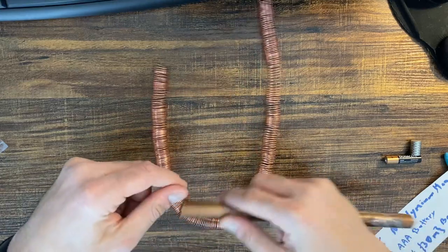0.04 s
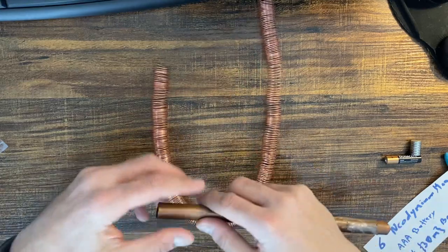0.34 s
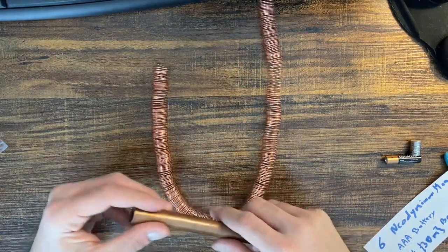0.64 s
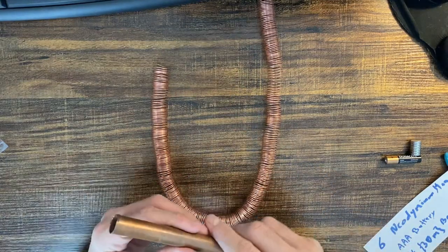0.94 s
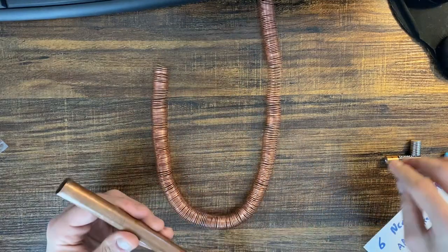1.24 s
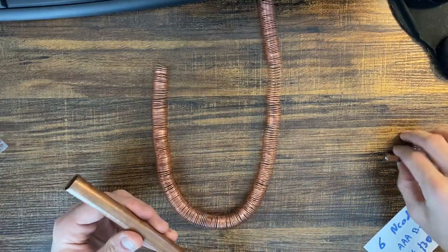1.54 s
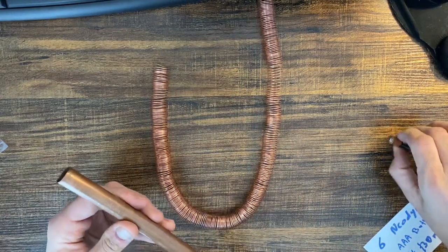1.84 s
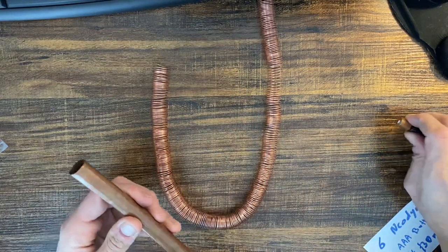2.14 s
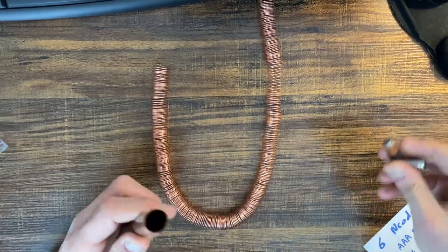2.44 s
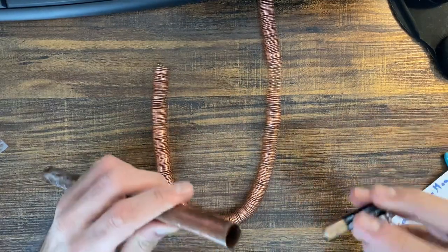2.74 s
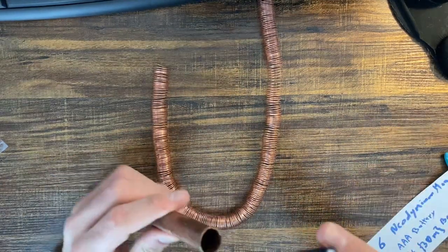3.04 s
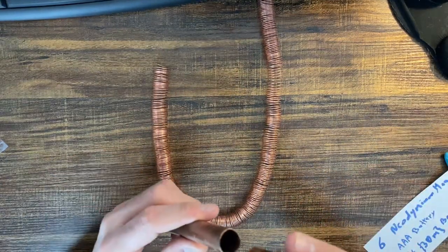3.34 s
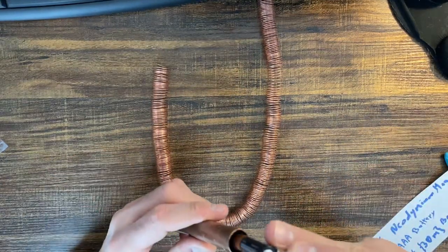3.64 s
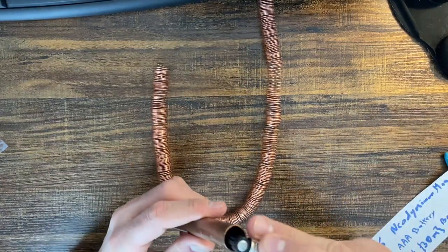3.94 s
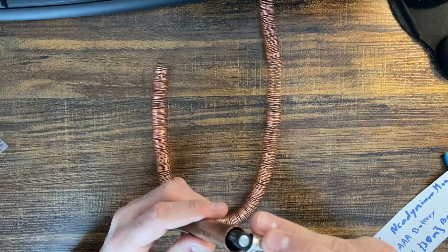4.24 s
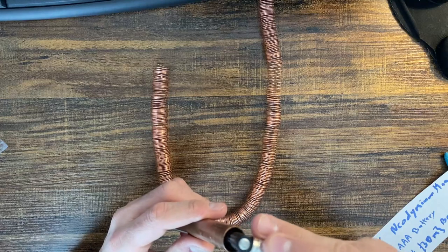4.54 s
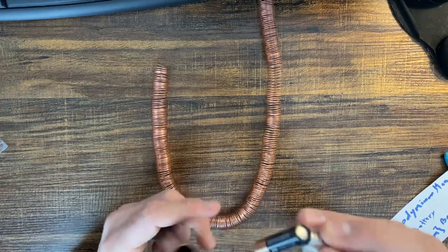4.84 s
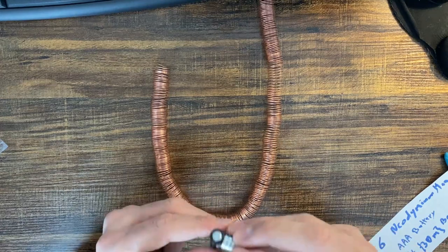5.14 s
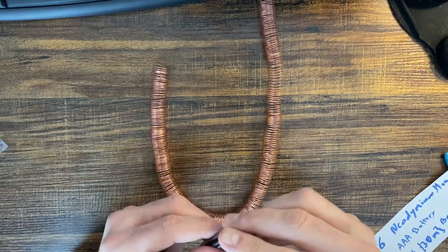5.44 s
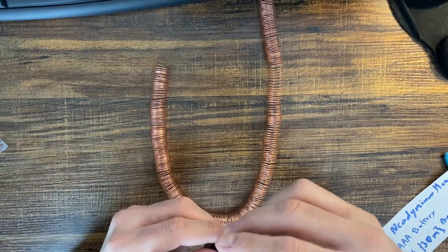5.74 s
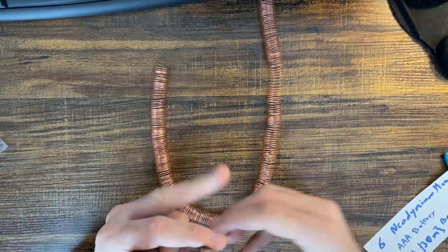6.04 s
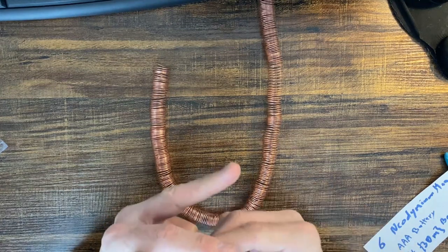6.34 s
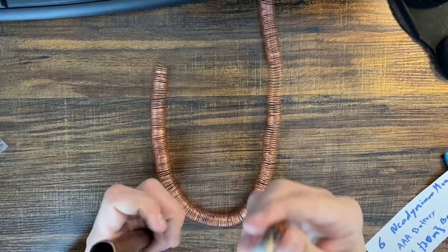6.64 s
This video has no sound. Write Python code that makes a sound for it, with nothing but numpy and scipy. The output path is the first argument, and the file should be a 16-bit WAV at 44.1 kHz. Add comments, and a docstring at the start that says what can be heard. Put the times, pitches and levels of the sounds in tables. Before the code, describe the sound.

Close handling of a copper tube and a battery with magnets: sharp snaps, metallic clinks and hollow knocks on a wooden table.

```python
"""Fingers rub faintly on a copper tube over the low rumble of arms leaning on a wooden table.
A battery with magnets scrapes across the wood, the magnets snap against metal, and knocks make the
top boom and clack. Tried in the mouth of the hand-held tube, the metal clinks briefly; fingernails
and wire tick. A small room, heard close up through the two microphone ports of a camera."""
import sys
import numpy as np
from scipy import signal
from scipy.fft import rfft, irfft, next_fast_len
from scipy.io import wavfile
from scipy.ndimage import map_coordinates

SR = 44100
rng = np.random.default_rng(int(sys.argv[2]) if len(sys.argv) > 2 else 0)


def waveform_to_disk(signal):
    """Save audio, clipped to [-1, 1], as 16-bit WAV at the path in sys.argv[1]."""
    frames = np.transpose(np.atleast_2d(signal))
    scaled = np.clip(frames, -1, 1) * 32767
    samples = np.round(scaled).astype(np.int16)
    wavfile.write(sys.argv[1], SR, samples)


N = 295029

# blows on the table: start_s, level_db, then relative to that level: boom_db, rap_db, clack_db
BLOWS = [(1.733, -49, 3.5, -21.5, -12.5), (1.741, -48.5, 6, -11.5, -14.5), (1.943, -53, -2, -12.5, -20),
         (1.985, -54.5, 2.5, -1, -5.5), (2.003, -50.5, -0.5, -14, -2), (2.051, -48.5, -7.5, -25, -11),
         (2.371, -22, -8, 1, -3), (2.483, -23.5, -8, 3.5, -5.5), (4.127, -41, -3, -16.5, -21),
         (4.331, -40, -4, -11, -21), (4.747, -22.5, -3.5, -1, -9), (4.828, -36.5, 2.5, 2, -12),
         (4.841, -30, -10, -2.5, -12), (4.859, -28, -7.5, -9, -16), (5.537, -29, -4, -5.5, -18),
         (5.716, -49.5, 3, -25.5, -30), (5.757, -50.5, 0.5, -8, -29), (5.824, -43, -2, -6, -14),
         (5.839, -27.5, -6, -6, -16), (5.945, -50, -0.5, -22, -9), (5.978, -45.5, 3.5, -24, -14.5),
         (6.141, -34, -2.5, -3.5, -17.5), (6.24, -34.5, -7, -10.5, -27), (6.648, -26, -5.5, -6.5, -16)]
# wall modes of the copper tube: pitch_hz, level_db, free_t60_s
TUBE_MODES = [(954, -21.5, 0.4), (2633, -0.5, 0.032), (2760, 5.5, 0.074), (2720, -29, 0.23),
              (4630, -20, 0.083), (5060, 4.5, 0.059), (5100, -16, 0.25), (5440, -5, 0.16), (7450, 2, 0.1),
              (7834, -5.5, 0.13), (10400, -39, 0.072), (10700, -26, 0.4), (14350, -33, 0.094)]
# spectrum of the midrange clack of a hard contact: frequency_hz, level_db
CLACK_SPECTRUM = [(700, -46), (1250, -2), (1450, 2.5), (1700, 2.5), (2050, 0.5), (2650, -4.5), (3300, -10),
                  (4500, -15), (8000, -49)]
# spectrum of the bright edge of a metal contact: frequency_hz, level_db
EDGE_SPECTRUM = [(2500, -30), (3400, -8), (4300, -13), (4800, -4), (5050, 1), (5700, -14), (6400, -7),
                 (7700, -6), (8800, -24), (11300, -16), (12800, -32), (15000, -25), (16000, -38)]


def amp(db):
    """Gain of a level in dB."""
    return 10 ** (np.asarray(db) / 20)


def unit(x):
    """x at rms 1."""
    return x / np.sqrt(np.mean(x ** 2) + 1e-20)


def along(points, hz):
    """(frequency_hz, value) points read on a log axis."""
    knots_hz, values = np.transpose(points)
    return np.interp(np.log(hz + 1), np.log(knots_hz + 1), values)


def wobble(rate):
    """A smooth random curve, rate knots a second."""
    knots = rng.standard_normal(int(N * rate / SR) + 4)
    return map_coordinates(knots, [np.arange(N) * rate / SR])


def filtered(x, response):
    """x through a complex response of frequency."""
    size = x.shape[-1]
    padded = next_fast_len(size + SR // 8)
    return irfft(rfft(x, padded) * response(np.fft.rfftfreq(padded, 1 / SR)), padded)[..., :size]


def noise(spectrum, size, likeness=None):
    """Coloured stereo noise of rms 1; left and right are as alike as for near sound unless given."""
    # likeness of near sound at the two ports: frequency_hz, correlation
    near_likeness = [(120, 0.94), (300, 0.28), (700, 0.14), (2000, 0.048), (6000, 0.28), (12000, .5)]
    hz = np.fft.rfftfreq(size, 1 / SR)
    angle = np.arccos(np.clip(along(likeness or near_likeness, hz), -1, 1)) / 2
    coloured = rfft(rng.standard_normal((2, size))) * amp(along(spectrum, hz))
    mid, side = irfft(coloured * [np.cos(angle), np.sin(angle)], size)
    return unit(np.array([mid + side, mid - side]))


def age():
    """Seconds since a contact."""
    return np.arange(SR // 3) / SR


def fade(t, t60, rise):
    """Envelope of a contact: a quick rise, then a steady fall in dB."""
    t = np.maximum(t, 0)
    return np.exp(-np.log(1000) * t / t60) * (1 - np.exp(-t / rise))


def stroke(start_s, hold_s, attack_s, release_s):
    """Envelope that rises, holds and dies away."""
    t = np.maximum(np.arange(N) / SR - start_s, 0)
    return (1 - np.exp(-t / attack_s)) * np.exp(-np.maximum(t - hold_s, 0) / release_s)


def swell(peak_s, half_s):
    """Envelope of pressure that grows towards a peak and eases off as it came."""
    nearness = np.exp(-np.abs(np.arange(N) / SR - peak_s) / half_s)
    return 2 * nearness / (1 + nearness ** 2)


def grain(rate, spread_db, life_s):
    """Grainy envelope of rms 1: tiny pulses of uneven size, rate a second."""
    pulses = (rng.random(N) < rate / SR) * amp(spread_db * rng.standard_normal(N))
    power = signal.fftconvolve(pulses ** 2, np.exp(-age() / life_s))[:N]
    return unit(np.sqrt(np.abs(power)))


def burst(spectrum, t60, rise):
    """Many close modes struck together and dying fast."""
    t = age()
    return noise(spectrum, len(t)) * fade(t, t60, rise)


def ring(modes, colour, travel_s=0):
    """Struck modes at new strengths; with travel_s the slow, low bending waves arrive later."""
    hz, db, t60 = np.transpose(modes)[:, :, None]
    delay = travel_s * np.maximum(np.sqrt(600 / hz) - 1, 0)
    scatter_db = 1.5 * rng.standard_normal(hz.shape)
    polarity = (-1) ** np.arange(len(hz))[:, None]
    gain = polarity * amp(db + along(colour, hz) + scatter_db)
    t = age() - delay
    return np.sum(gain * np.sin(2 * np.pi * hz * t) * fade(t, t60, rise=0.5 / hz), axis=0)


def add(track, start_s, sound):
    """Mix a sound into the track."""
    start = max(round(start_s * SR), 0)
    part = sound[..., :N - start]
    track[:, start:start + part.shape[-1]] += part


def room_tone():
    """The faint, steady noise of the room, mostly bass."""
    # noise floor: frequency_hz, level_db
    floor_spectrum = [(20, -27), (32, -7.5), (48, -1), (74, -0.5), (180, -18), (344, -18.5), (911, -29.5),
                      (3000, -37), (7500, -42), (11000, -45.5), (16000, -49)]
    return amp(-70) * noise(floor_spectrum, N)


def reverb(x):
    """The diffuse answer of the small room; treble dies first."""
    # likeness of the reflections at the two ports: frequency_hz, correlation
    likeness = [(100, 1), (250, 1), (600, -0.12), (2500, 0.47), (5500, 0.42), (12000, -0.59)]
    # reverberation time: frequency_hz, t60_s
    decay_times = [(100, 1), (400, .6), (1500, 0.38), (4000, 0.28), (8000, 0.15), (15000, 0.11)]
    # strength of the reflections: frequency_hz, level_db
    colour = [(80, -18), (250, -10.5), (700, -11), (2000, -5), (5500, -10), (12000, -8.5)]
    white = noise([(20, 0), (20000, 0)], SR, likeness)
    hz, t, bands = signal.stft(white, SR, nperseg=256)
    t60 = along(decay_times, hz)[:, None]
    energy = SR * t60 / (2 * np.log(1000))
    gain = amp(along(colour, hz))[:, None] / np.sqrt(energy)
    _, tail = signal.istft(bands * fade(t, t60, rise=0.002) * gain, SR, nperseg=256)
    return signal.fftconvolve(x[:1], tail, axes=1)[:, :N]


def table_rumble():
    """Arms lean and hands push on the table, and blows leave it shuddering."""
    # hands pushing on the top: peak_s, level_db, width_s
    pushes = [(0.157, -62.5, .06), (0.491, -55, 0.03), (0.87, -57, .035), (1.482, -49, .015),
              (1.625, -50.5, .03), (1.937, -46, .028), (2.306, -51, .04), (5.483, -40.5, 0.04)]
    # forearms leaning on it: peak_s, half_length_s, level_db
    leans = [(0.196, 0.24, -62), (0.58, 0.074, -60.5), (1.146, 0.28, -66), (1.705, 0.088, -57.5),
             (5.26, 0.17, -56.5), (5.651, 0.12, -54)]
    # rumble of the table: frequency_hz, level_db
    rumble_spectrum = [(15, -27), (25, -11), (53, -1), (73, -3.5), (107, -9), (141, -13.5), (210, -20.5),
                       (348, -25.5), (382, -33.5), (532, -40.5), (600, -34.5), (780, -75.5), (1320, -120)]
    push_spectrum = [(45, -33.5), (90, 3.5), (130, -1.5), (220, -16.5), (500, -33), (1500, -62.5)]
    rest_db, uneven_db, shudder_db = -70, 3.5, -27
    t = np.arange(N) / SR
    pushing = sum(amp(db) * np.exp(-((t - s) / width_s) ** 2) for s, db, width_s in pushes)
    leaning = [amp(db) * swell(s, half_s) for s, half_s, db in leans]
    shudders = [amp(db + shudder_db) * stroke(s, 0, attack_s=0.03, release_s=0.21)
                for s, db, *_ in BLOWS]
    strength = np.sqrt(amp(rest_db) ** 2 + sum(part ** 2 for part in leaning + shudders))
    rumble = strength * amp(uneven_db * wobble(rate=13)) * noise(rumble_spectrum, N)
    return rumble + pushing * noise(push_spectrum, N)


def ticks():
    """Fingernails and wire make tiny dry contacts, each a broad band of noise."""
    # light contacts: start_s, relative_db, centre_hz
    touches = [(2.183, -64.5, 7400), (3.101, -55.5, 15000), (3.278, -52.5, 13900), (3.452, -65.5, 11800),
               (3.477, -58.5, 14100), (5.07, -32, 7900), (5.190, -36.5, 6470), (5.42, -50, 14370),
               (5.576, -48.5, 11300), (5.63, -42.5, 3590), (5.853, -60, 4000), (5.95, -78, 3570),
               (5.978, -80, 3630), (6.044, -46.5, 15300), (6.16, -51, 3930)]
    out = np.zeros((2, N))
    for start_s, db, hz in touches:
        band = [(hz / 10, -24), (hz / 2, -4), (hz, 0), (hz * 2, -3)]
        add(out, start_s, amp(db - 6.5) * burst(band, t60=0.022, rise=0.00053))
    return out


def click_tails():
    """A short, grainy hiss dies away after each of two sharp clicks."""
    # tails of the two clicks: start_s, level_db
    tails = [(5.066, -52), (5.186, -63.5)]
    # hiss of a tail: frequency_hz, level_db
    tail_spectrum = [(300, -4), (700, 0.5), (1500, -3), (3000, -1), (5000, -6), (6400, -14.5), (7800, -7.5),
                     (9500, -23.5), (11300, -15), (16000, -27)]
    level = sum(amp(db) * stroke(s, hold_s=0.012, attack_s=0.0071, release_s=0.063) for s, db in tails)
    return level * grain(rate=2500, spread_db=2, life_s=0.0033) * noise(tail_spectrum, N)


def tube_wall(hz):
    """Response of the rubbed tube: one narrow resonance for each mode."""
    width_hz = 60
    damping = 1j * hz * width_hz
    return sum(amp(db) * damping / (mode_hz ** 2 - hz ** 2 + damping) for mode_hz, db, _ in TUBE_MODES)


def finger_rubs():
    """Skin hisses on the copper; where it catches, the modes of the tube sing."""
    # strokes along the tube: peak_s, half_length_s, relative_hiss_db, relative_singing_db
    rubs = [(0.01, 0.0094, -67.5, -68), (0.673, 0.037, -66, -67), (0.801, 0.013, -77.5, -98),
            (0.899, 0.02, -69.5, -81), (1.05, 0.025, -73, -74), (1.816, 0.055, -83.5, -110),
            (1.995, 0.015, -77, -110), (3.122, 0.013, -77.5, -105), (3.28, .035, -78.5, -105),
            (3.464, .015, -88, -105), (4.39, 0.016, -87.5, -81.5), (4.636, 0.053, -87.5, -73),
            (5.419, 0.011, -70.5, -95)]
    # hiss of skin on copper: frequency_hz, level_db
    skin_spectrum = [(1200, -49), (2200, -31), (3600, -18), (5000, -5), (6500, -8), (8000, 0.5),
                     (9200, -22), (11000, 2.5), (13000, -12), (15500, 3)]
    pressure = sum(amp(db) * swell(s, half_s) for s, half_s, db, _ in rubs)
    catch = sum(amp(db) * swell(s, half_s) for s, half_s, _, db in rubs)
    hiss = pressure * grain(rate=2700, spread_db=3, life_s=0.0022) * noise(skin_spectrum, N)
    friction = noise([(1500, -11), (2800, 15), (5000, 0), (8000, -15)], N)
    singing = catch * unit(filtered(friction, tube_wall))
    return amp(6) * hiss + amp(-9.5) * singing


def tube_clinks():
    """Metal touches the tube: a crack, then wall modes that die sooner the tighter it is held."""
    # contacts with the tube: start_s, level_db, treble_db, share of the free ring time left by the grip
    contacts = [(0.003, -77.5, 8, 1), (0.205, -74, 5, 0.69), (0.873, -90.5, 22, .95),
                (3.711, -43.5, -5, 0.75), (4.031, -47, 6, 0.27), (4.346, -70, -21.5, .9)]
    # crack of metal on copper: frequency_hz, level_db
    crack_spectrum = [(300, -6), (700, -3), (1100, 1), (1800, -9), (2700, 3.5), (3500, -6.5), (4700, 6.5),
                      (6300, -7.5), (7800, 6), (9000, -20), (11000, 0.5), (15000, -20)]
    out = np.zeros((2, N))
    for start_s, db, treble_db, ring_share in contacts:
        colour = [(2800, db), (5000, db + treble_db)]
        crack = burst(crack_spectrum, t60=0.026, rise=0.001)
        crack = filtered(crack, lambda hz: amp(along(colour, hz)))
        held_modes = [(hz, mode_db, t60 * ring_share) for hz, mode_db, t60 in TUBE_MODES]
        add(out, start_s, ring(held_modes, colour) + 2 * crack)
    return out


def battery_drags():
    """Metal breaks loose at once, catches and slips on the grain of the wood, and coasts to a stop."""
    # pulls across the top: start_s, length_s, level_db
    pulls = [(1.454, 0.09, -69), (1.559, 0.042, -47.5), (1.73, 0.0086, -53), (1.993, 0.011, -42.5),
             (2.043, 0.023, -59), (5.733, 0.14, -64), (5.872, 0.062, -56.5), (5.993, 0.046, -65)]
    # metal scraping on wood: frequency_hz, level_db
    scrape_spectrum = [(180, -23), (300, 4), (460, -17.5), (700, 5), (900, -6), (1050, -3), (1250, -12),
                       (2200, -17), (3000, -26), (4000, -36.5), (7000, -64), (12000, -83)]
    pressure = sum(amp(db) * stroke(s, length_s, attack_s=0.004, release_s=0.02)
                   for s, length_s, db in pulls)
    return pressure * grain(rate=500, spread_db=3, life_s=0.003) * noise(scrape_spectrum, N)


def magnet_snaps():
    """Magnets jump the last bit and hit with a hard crack and a very short ring."""
    # magnets hitting metal: start_s, level_db
    snaps = [(2.3755, -24), (2.3801, -28), (4.7486, -39.5)]
    # modes of magnets pressed face to face: pitch_hz, level_db, t60_s
    magnet_modes = [(1790, -3.5, .05), (2670, -4, .03), (3205, -3.5, .05), (4950, 2, .04), (5120, -1, .035),
                    (6380, -4, .04), (7280, -9, .03), (7760, -4, 0.053), (9500, -12, .04),
                    (11400, -15.5, 0.036), (14950, -18.5, .05)]
    out = np.zeros((2, N))
    for start_s, db in snaps:
        edge = amp(-1.5) * burst(EDGE_SPECTRUM, t60=0.027, rise=0.00034)
        clack = amp(-10.5) * burst(CLACK_SPECTRUM, t60=0.04, rise=0.00051)
        ping = amp(-6.5) * ring(magnet_modes, [(1800, -1.2), (5000, 0.85)])
        add(out, start_s, amp(db) * (edge + clack + ping))
    return out


def table_dip(hz, delay_s):
    """The whole top dips once and springs back, a moment after the blow."""
    phase_squared = (np.pi * hz * (age() - delay_s)) ** 2
    return (1 - 2 * phase_squared) * np.exp(-phase_squared)


def table_knocks():
    """Each blow rings the table top; the harder the contact, the more clack and metal edge it has."""
    # modes of the top: pitch_hz, level_db, t60_s
    top_modes = [(70.6, -13.5, 0.033), (91, -2.5, 0.25), (120.3, 6, 0.17), (137.3, -0.5, 0.44),
                 (193, 5, 0.23), (245, -6.5, 0.013), (285.45, 0.5, 0.38), (320, -17, 0.7), (353, 5, 0.27),
                 (427, -0.5, .12), (457, -6.5, 0.12), (524, 3, 0.18), (623.7, 4, 0.14), (690.5, 2, .22),
                 (710, -8, 0.14), (885, -7.5, 0.012), (948, -9, 0.19), (1036.7, -1.5, 0.058),
                 (974, -13, .1)]
    # dull body of the wood: frequency_hz, level_db
    wood_spectrum = [(100, -28), (250, -5), (450, -4), (640, 0), (740, -11), (900, -25.5), (2000, -63)]
    # hollow rap of the wood: frequency_hz, level_db
    rap_spectrum = [(450, -41), (680, -5), (780, 4), (860, -3.5), (960, -3), (1030, 2.5), (1130, -8),
                    (1400, -24.5), (3000, -56.5)]
    # modes of the battery and its magnets rattling on the top: pitch_hz, level_db, t60_s
    battery_modes = [(1252, -8, .18), (1331, -9, .16), (1739, -1, .1), (1884, -7, .1), (2640, -2, .08),
                     (2900, -6, .1), (3828, -11, .2), (4960, 2, .06), (5131, -7, .25), (6330, -7, .12),
                     (6922, -13, .15), (7700, -6, .1), (11400, -16, .1)]
    out = np.zeros((2, N))
    for start_s, db, boom_db, rap_db, clack_db in BLOWS:
        edge_db = -4.5 + 1.75 * clack_db  # hardness brings out the edge faster than the clack
        top_colour = [(230, boom_db), (420, -6.5), (680, -8), (900, rap_db)]
        top = amp(-6) * ring(top_modes, top_colour, travel_s=0.0054)
        thud = amp(boom_db + 5) * table_dip(hz=159, delay_s=0.015)
        wood = amp(-3.5) * burst(wood_spectrum, t60=0.11, rise=0.0023)
        rap = amp(rap_db - 1) * burst(rap_spectrum, t60=0.094, rise=0.0015)
        clack = amp(clack_db - 0.5) * burst(CLACK_SPECTRUM, t60=0.091, rise=0.0011)
        edge = amp(edge_db) * burst(EDGE_SPECTRUM, t60=0.079, rise=0.00048)
        metal = amp(-15) * ring(battery_modes, [(3000, clack_db), (4800, edge_db)])
        add(out, start_s - 0.001, amp(db) * (top + thud + wood + rap + clack + edge + metal))
    return out


def microphone_ports(hz):
    """Left and right response: near sound reaches the two ports with different level and phase."""
    # left over right: frequency_hz, balance_db
    balance = [(150, 0.5), (300, 1), (700, 4.5), (2200, 2.5), (5500, 5), (11000, -2.5)]
    # left ahead of right: frequency_hz, phase_rad
    lead = [(100, 0), (300, 0.75), (700, 1.64), (2800, 1.09), (5500, -2.5), (8000, 12.5), (12000, -1.5)]
    left = amp(along(balance, hz) / 2) * np.exp(0.5j * along(lead, hz))
    return np.array([left, 1 / left])


def scene():
    """Handling close to the microphone, with the room and the table's rumble behind it."""
    on_table = table_knocks() + magnet_snaps() + battery_drags()
    in_hand = tube_clinks() + ticks() + finger_rubs() + click_tails()
    floor = room_tone()
    direct = filtered(on_table + in_hand, microphone_ports)
    reflected = reverb(on_table + amp(1) * in_hand)
    return direct + reflected + table_rumble() + floor


def record(dry):
    """The camera drops the deepest rumble and keeps nothing above its band limit."""
    low_cut_hz, top_hz = 34.4, 16000
    dry = signal.sosfilt(signal.butter(2, low_cut_hz, "high", fs=SR, output="sos"), dry)
    return filtered(dry, lambda hz: 1 / (1 + (hz / top_hz) ** 120))


dry = scene()
out = record(dry)
waveform_to_disk(out)
```